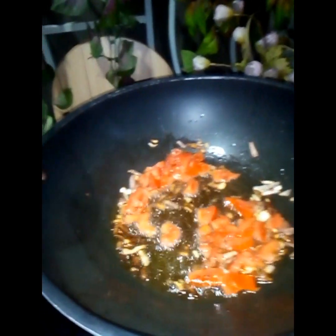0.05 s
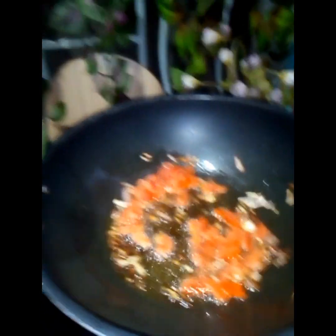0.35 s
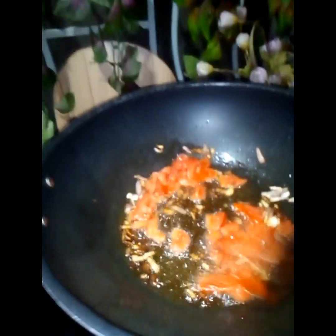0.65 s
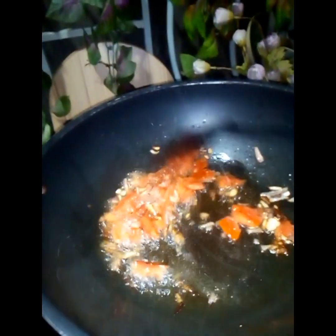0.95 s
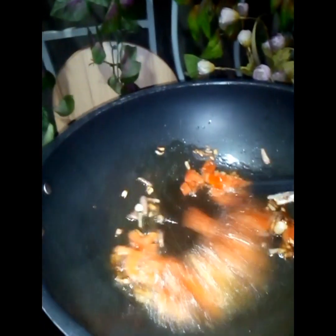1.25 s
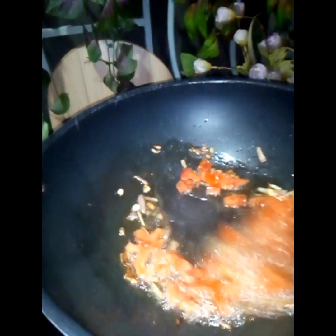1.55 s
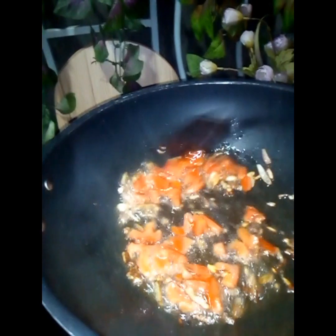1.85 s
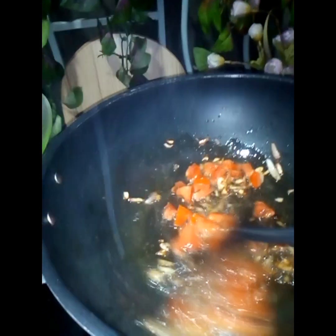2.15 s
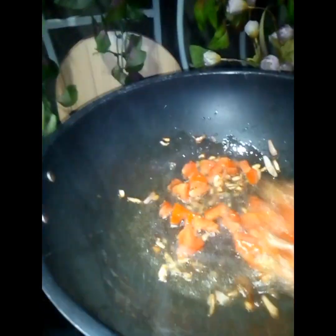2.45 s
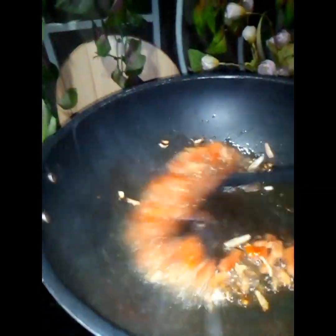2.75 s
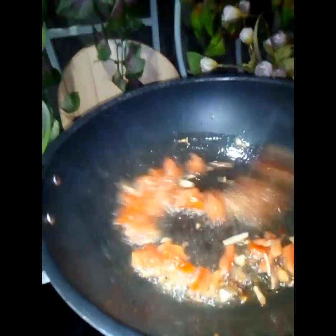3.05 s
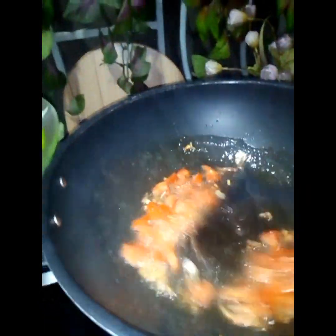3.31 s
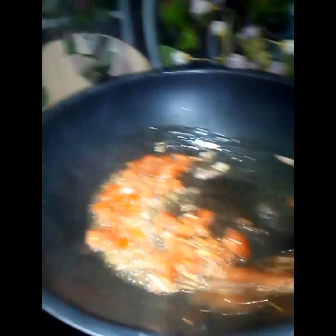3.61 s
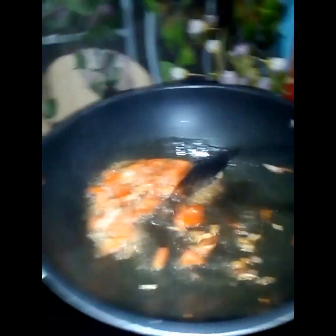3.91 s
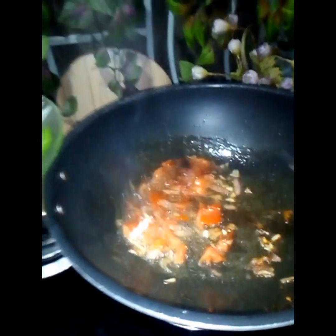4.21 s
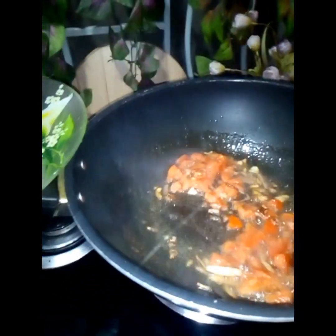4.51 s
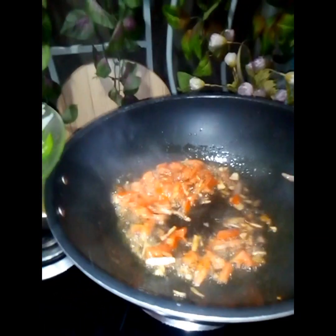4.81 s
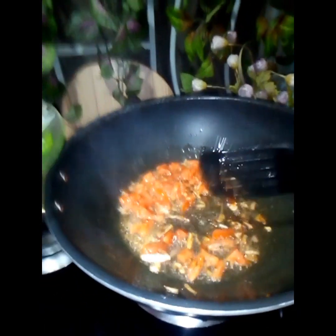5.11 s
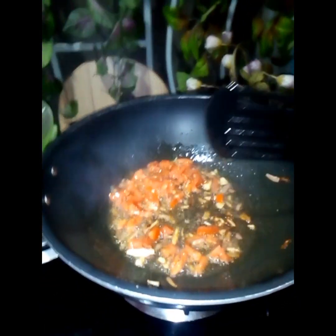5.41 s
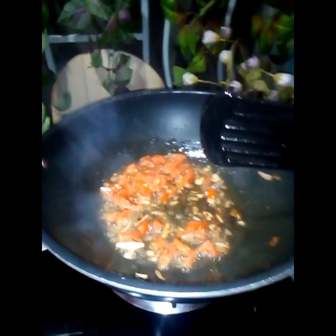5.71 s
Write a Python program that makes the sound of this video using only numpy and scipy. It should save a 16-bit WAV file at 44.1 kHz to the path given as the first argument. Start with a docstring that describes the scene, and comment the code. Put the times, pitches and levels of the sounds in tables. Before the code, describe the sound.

Close, bright sizzling and popping of vegetables frying in a wok, with faint wet stirring and two light spatula knocks.

```python
"""A small kitchen, with one microphone close to a wok of chopped onion and tomato frying in hot oil.
Countless steam bubbles burst in the oil; a few drops spit louder and the finest tick on the bare metal.
A plastic spatula rubs the pan, squeezes the wet food and knocks twice; early on it shakes the wok too.
A low throb, like a motor some way off, comes and goes underneath; the room adds a short tail."""
import sys
import numpy as np
from scipy import signal
from scipy.io import wavfile
from scipy.ndimage import uniform_filter1d

SR = 44100
rng = np.random.default_rng(int(sys.argv[2]) if len(sys.argv) > 2 else 0)


def persist_wave(psi):
    """Save psi, clipped to +-1, as 16-bit WAV."""
    counts = np.round(np.clip(psi, -1, 1) * 32767).astype(np.int16)
    wavfile.write(sys.argv[1], SR, np.atleast_2d(counts).T)


N = 262826
TIME = np.arange(N) / SR


def gain_of(db):
    """Decibels to amplitude."""
    return 10 ** (np.asarray(db) / 20)


def evened(x):
    """Scales to an rms of 1."""
    return x / np.sqrt(np.mean(x ** 2) + 1e-20)


def steadied(x, window_s=0.25):
    """Takes the slow swells out of a texture and leaves its fast grain."""
    return x / np.sqrt(abs(uniform_filter1d(x ** 2, max(int(window_s * SR), 2))) + 1e-12)


def levels(table):
    """The dB columns of a curve table as gains, sample by sample."""
    times, *columns = np.transpose(table)
    return [gain_of(np.interp(TIME, times, db)) for db in columns]


def arch(start, length):
    """Half a sine that swells from 0 to 1 and settles again."""
    return np.sin(np.pi * np.clip((TIME - start) / length, 0, 1))


def wander(window_s):
    """A smooth random drift of rms 1."""
    window = signal.windows.hann(max(int(window_s * SR), 3))
    return evened(signal.oaconvolve(rng.standard_normal(N), window, "same"))


def add(mix, start, sound, peak_db):
    """Mixes a sound in at a start time in seconds, scaled to the given peak."""
    part = mix[max(round(start * SR), 0):][:len(sound)]
    part += gain_of(peak_db) * sound[:len(part)] / abs(sound).max()


def bandpassed(x, low_hz, high_hz, order):
    """Keeps the band between two frequencies."""
    return signal.sosfilt(signal.butter(order, [low_hz, high_hz], "band", fs=SR, output="sos"), x)


def coloured(x, spectrum, size=8192):
    """Causal filter with the given spectrum, so clicks keep their attack; rms 1."""
    hz, db = np.transpose(spectrum)
    grid = np.maximum(abs(np.fft.fftfreq(size, 1 / SR)), 1)
    octaves_outside = np.maximum(np.log2(hz[0] / grid), 0) + np.maximum(np.log2(grid / hz[-1]), 0)
    grid_db = np.interp(np.log(grid), np.log(hz), db) - 60 * octaves_outside
    log_gain = np.log(gain_of(np.maximum(grid_db, -100)))
    taps = np.fft.ifft(np.exp(np.conj(signal.hilbert(log_gain)))).real[:size // 2]  # minimum phase
    return evened(signal.oaconvolve(x, taps)[:N])


def clicks(per_s, spread_db):
    """Random clicks, most small and a few large when the spread is positive."""
    strength = gain_of(spread_db * np.minimum(rng.exponential(1, N), 4.5))
    return strength * rng.choice([-1., 1.], N) * (rng.random(N) < per_s / SR)


def grains(train, shapes):
    """Each click sets off one of the shapes, picked at random."""
    pick = rng.integers(0, len(shapes), N)
    onsets = np.flatnonzero(train)
    places = onsets[:, None] + np.arange(shapes.shape[1])
    sounds = train[onsets, None] * shapes[pick[onsets]]
    return np.bincount(places.ravel(), sounds.ravel(), N)[:N]


def kitchen(x, wet_db, t60, size=12000):
    """Direct sound at the microphone, plus dense reflections off the wok wall and the room."""
    t = np.arange(size) / SR
    reflections = rng.standard_normal(size) * (rng.random(size) < .1) * (t > .001)
    tail = reflections * gain_of(-60 * t / t60)
    return x + gain_of(wet_db) * signal.oaconvolve(x, tail / np.linalg.norm(tail))[:N]


def diffuse(x, wet_db, t60, size=8000):
    """Reflections of scattered bursts, each on its own path, blur into a hiss that follows them."""
    fade = gain_of(-120 * np.arange(size) / SR / t60)  # power falls 60 dB in t60
    power = abs(signal.oaconvolve(x ** 2, fade / fade.sum())[:N])
    return x + gain_of(wet_db) * np.sqrt(power) * rng.standard_normal(N)


def bursts(per_s, spread_db, decay_s, count=200, size=256):
    """Oil films tear: tiny puffs of noise in many colours."""
    shapes = rng.standard_normal((count, size)) * np.exp(-np.arange(size) / SR / decay_s)
    return evened(grains(clicks(per_s, spread_db), shapes))


def bubbles(per_s, spread_db, centre_hz, octaves, decay_s, count=200, size=400):
    """Small steam bubbles ring briefly, at pitches scattered round a centre."""
    t = np.arange(size) / SR
    hz = centre_hz * 2 ** (octaves * rng.uniform(-1.002, 1, (count, 1)))
    rings = np.sin(2 * np.pi * hz * t) * np.exp(-t / decay_s)
    return evened(grains(clicks(per_s, spread_db), rings))


def spurting(per_s, decay_s, limit=0.8):
    """Pockets of water meet the oil: each flares at once, up to a limit, and dies away; rms 1."""
    kicks = abs(clicks(per_s, spread_db=5.5))
    flare = signal.lfilter([1], [1, -np.exp(-1 / (SR * decay_s))], kicks - kicks.mean())
    return evened(np.tanh(evened(flare) / limit))


# Bubble size, as the weight of low bubbles over high ones: (time [s], tilt [dB])
BUBBLE_SIZE = [(0, 3), (0.4, -1), (0.8, 0.5), (2.15, 0.5), (2.6, 1.5), (2.83, 2), (3.1, 1.7), (3.45, 0),
               (3.9, -1), (4.4, -0.5), (4.8, -0.3), (4.98, 2), (5.14, 0.5), (5.24, -2.5), (5.45, -1.5),
               (5.6, 3.5), (5.75, -1), (5.96, 0.5)]
def sized(x, split_hz=4080):
    """Larger bubbles ring lower: tips the sizzle to below or above its middle pitch."""
    lower = signal.sosfiltfilt(signal.butter(8, split_hz, fs=SR, output="sos"), x)
    weight = np.sqrt(levels(BUBBLE_SIZE)[0])
    return lower * weight + (x - lower) / weight


# Modes of the loaded wok: (frequency [Hz], level [dB], t60 [s])
WOK_MODES = [(272, 7, 0.12), (335, 3, 0.08), (433, 8, 0.07), (535, 8, 0.06), (614, 4, 0.09), (665, 4, 0.14),
             (845, 3, 0.06), (958, -8, 0.14), (1112, -7, 0.09), (1289, -3, 0.076), (1439, -7, 0.046),
             (1935, -5, 0.08), (2190, -5, 0.064)]
# Colour of the bursts under the food: (frequency [Hz], level [dB])
CRACKLE_COLOUR = [(500, -45), (780, -33.5), (950, -1.5), (1150, -3.5), (1400, -4.5), (1620, 1.5),
                  (1950, -2.5), (2300, -1), (2800, 1.5), (3500, -17.5)]
def crackle(fizz, ring_db=3.0):
    """Bursts under the food sound duller and ring the modes of the wok."""
    snaps = 0.82 * fizz + bursts(per_s=900, spread_db=1.5, decay_s=0.0013)
    dull = coloured(snaps, CRACKLE_COLOUR)
    rings = sum(gain_of(db) * signal.lfilter(*signal.iirpeak(hz, hz * t60 / 2.2, SR), dull)
                for hz, db, t60 in WOK_MODES)
    return steadied(dull + gain_of(ring_db) * rings)


# Colour of the fine spray over the pan: (frequency [Hz], level [dB])
SPRAY_COLOUR = [(6500, -24.5), (8300, 1.5), (10000, -12), (12000, -22), (15500, -35)]
def spray(fizz):
    """The top of the fizz, joined by fine droplets that burst on their own."""
    droplets = 0.91 * fizz + bursts(per_s=1200, spread_db=-3.0, decay_s=.001)
    return steadied(coloured(droplets, SPRAY_COLOUR))


# How hard the food fries, close to the microphone: (time [s], sizzle [dB], crackle [dB], spray [dB])
FRYING = [(0, -34.5, -51, -75), (0.25, -35.5, -59, -76), (0.44, -33.5, -48.5, -74.5),
          (0.56, -29, -48.5, -63), (1.05, -28.5, -44.5, -63.5), (1.75, -27.5, -44, -64.5),
          (2.0, -28.5, -45, -63.0), (2.18, -26.2, -42.5, -62), (2.38, -27, -44, -64),
          (2.55, -28.5, -44, -63.5), (2.8, -27, -44.5, -63), (3.05, -28.5, -44, -64.0),
          (3.28, -30.5, -45.5, -67.5), (3.55, -31.5, -46.5, -64.5), (4.3, -31, -46.5, -65.5),
          (5.05, -32, -47.5, -68.5), (5.3, -33, -48.5, -70.5), (5.96, -32.5, -48.5, -70.5)]
# Wet food lands on bare hot metal and the sizzle flares: (start [s], length [s], lift [dB])
FLARES = [(0.928, 0.082, 2.5), (1.075, 0.077, 2.5), (2.128, .13, 1.7), (2.252, .1, 1.7), (2.96, 0.086, 1.5),
          (3.132, 0.1, 1.5), (3.31, 0.039, 2.5), (3.396, 0.059, 2), (3.576, 0.13, 2), (3.788, 0.18, 2.5),
          (4.72, 0.11, 2.2), (4.865, 0.065, 1.5), (4.942, 0.13, 3), (5.065, 0.13, 2.5), (5.2, 0.058, 1.5),
          (5.345, 0.07, 2.5), (5.456, 0.075, 1.5), (5.566, 0.09, 2.5), (5.78, 0.066, 1.5)]
# From separate spurts to an even wash and back: (time [s], unevenness [dB], large bubbles [dB])
SPUTTER = [(0, 4, -14), (0.42, 2.2, -8), (0.65, 1.3, -17), (2.2, 0.16, -24.5), (5.2, 0.6, -17.5),
           (5.45, 0.8, -13.5), (5.96, -2, -14)]
# Colour of the bubbles bursting in the open oil: (frequency [Hz], level [dB])
SIZZLE_COLOUR = [(1500, -62), (2000, -43), (2400, -18.5), (2850, -6), (3400, -3), (3800, -3), (4220, 0.5),
                 (4900, -4.5), (5350, -6.5), (5900, -9.5), (6600, -11), (7100, -19), (7900, -27.5),
                 (9500, -60.5)]
def sizzle(spray_flare_share=0.46, splatter_db=0.5):
    """Bursts and ringing bubbles spurt over a hiss of steam, with crackle below and spray above."""
    heat, crackle_level, spray_level = levels(FRYING)
    flare_db = sum(db * arch(start, length) for start, length, db in FLARES)
    heat *= gain_of(flare_db)
    spray_level *= gain_of(spray_flare_share * flare_db + splatter_db * spurting(per_s=37, decay_s=.025))

    times, uneven_db, large_db = np.transpose(SPUTTER)
    tearing = bursts(per_s=2000, spread_db=1.1, decay_s=0.00058)
    ringing = bubbles(per_s=650, spread_db=2.5, centre_hz=4149, octaves=0.279, decay_s=0.0043, size=500)
    spurts = gain_of(np.interp(TIME, times, uneven_db) * spurting(per_s=280, decay_s=0.012))
    steam = gain_of(0.5) * (heat / heat.max()) ** 0.063 * rng.standard_normal(N)
    fizz = diffuse(spurts * (tearing + gain_of(-7.5) * ringing + steam), wet_db=-3.5, t60=0.1)

    large = bubbles(per_s=500, spread_db=0.5, centre_hz=2775, octaves=0.27, decay_s=0.00075)
    large = gain_of(np.interp(TIME, times, large_db)) * spurts * bandpassed(large, 1900, 3600, order=2)
    bright = steadied(sized(coloured(fizz, SIZZLE_COLOUR)) + large, window_s=0.12)
    return (gain_of(-0.28) * heat * bright
            + gain_of(1.5) * crackle_level * crackle(fizz)
            + gain_of(3.5) * spray_level * spray(fizz))


# Puffs of mist as wet food is swept onto bare metal: (start [s], length [s], level [dB])
MIST_PUFFS = [(0.5, 0.24, -76.5), (1.05, 0.14, -74), (1.44, 0.08, -75), (2.08, 0.32, -75),
              (2.52, 0.51, -74), (2.97, 0.25, -76), (4.66, 0.19, -79)]
def mist(under_spray_db=-20.0, spatter_db=2.0):
    """Very high, thin fizz that spatters along with the spray and thickens in each puff."""
    _, _, spray_level = levels(FRYING)
    puffs = sum(gain_of(db) * arch(start, length) for start, length, db in MIST_PUFFS)
    level = np.hypot(gain_of(under_spray_db) * spray_level, puffs)
    spatter = gain_of(spatter_db * spurting(per_s=70, decay_s=.014))
    fizz = bandpassed(bursts(per_s=1200, spread_db=2.0, decay_s=.0015), 10000, 15500, order=3)
    return level * evened(spatter * fizz)


# The loudest spits of oil, close by: (time [s], level [dB], pitch [Hz], decay [s])
LOUD_SPITS = [(0.061, -22, 4340, .004), (0.0946, -22, 4370, .002), (0.1272, -18, 3800, 0.0065),
              (0.133, -17, 5040, .005), (0.143, -15, 4900, .002), (0.169, -21, 3900, 0.007),
              (0.2286, -20.5, 3580, 0.011), (0.3012, -18, 3500, 0.0094), (0.3306, -20, 3610, 0.0067),
              (0.38, -20, 3460, .003), (0.4128, -13, 3630, 0.002), (0.578, -11, 3800, 0.0037),
              (0.719, -11, 4000, 0.0022), (0.802, -14.5, 3370, 0.0064), (0.8916, -12.5, 4230, .002),
              (1.153, -10, 4380, 0.0027), (1.4704, -10.5, 4240, 0.0028), (2.0836, -13, 3730, 0.0027),
              (2.221, -11, 4740, 0.0046), (2.347, -9, 4180, 0.0058), (2.435, -10, 4010, 0.0076),
              (2.765, -9, 4300, 0.00063), (2.899, -13, 4370, 0.0026), (3.1434, -13, 4400, 0.0043),
              (3.3154, -20, 4060, .002), (4.021, -13, 3670, 0.0054), (5.144, -16.5, 3860, .006),
              (5.235, -20.5, 4130, .005), (5.6084, -15, 3740, 0.0057), (5.6781, -18, 3480, 0.0054)]
def spits(crack=0.52, small_db=7, small_hz=4300, small_decay_s=0.001, small_count=28, size=1600):
    """A water drop flashes to steam: a crack and a short ring. Small ones follow the frying's level."""
    out, t = np.zeros(N), np.arange(size) / SR
    band_hz = (2400, 5600)
    times, heat_db = np.transpose(FRYING)[:2]
    small_spits = []
    for start, loud, high in rng.uniform([0, -1, -1], [N / SR, 1, 1], (small_count, 3)):
        db = np.interp(start, times, heat_db) + small_db + 2 * loud
        small_spits.append((start, db, small_hz * 2 ** (0.53 * high), small_decay_s))
    for start, db, hz, decay_s in LOUD_SPITS + small_spits:
        tear = evened(bandpassed(rng.standard_normal(size), *band_hz, order=3))
        pop = (np.sin(2 * np.pi * hz * t) + crack * tear) * np.exp(-t / decay_s)
        add(out, start, pop, db)
    return gain_of(-4.0) * bandpassed(diffuse(out, wet_db=-15.0, t60=0.24), *band_hz, order=3)


# The finest droplets on bare hot metal: (time [s], level [dB], pitch [Hz])
DROPLET_TICKS = [(0.1225, -49, 10100), (0.31, -61, 10800), (2.903, -57, 12500)]
def ticks(decay_s=0.0022, width_hz=1700, size=1000):
    """A pinhead of water skips on the pan: a thin, very high tick."""
    out, t = np.zeros(N), np.arange(size) / SR
    for start, db, hz in DROPLET_TICKS:
        snap = rng.standard_normal(size) * np.exp(-t / decay_s)
        add(out, start, bandpassed(snap, hz - width_hz / 2, hz + width_hz / 2, order=6), db)
    return kitchen(out, wet_db=-8, t60=0.091)


# The spatula pushes the food round, close by: (time [s], rub [dB], squelch [dB])
STIRRING = [(0.0, -83, -102), (0.38, -90, -77), (0.52, -60, -53), (0.7, -65, -59), (0.88, -56.5, -61),
            (1.01, -54.5, -53), (1.9, -54, -55.5), (2.3, -55, -54), (3.15, -58, -53.5), (3.33, -57, -54.5),
            (3.92, -66, -59.5), (4.1, -61.5, -55.5), (4.38, -57, -54.5), (4.52, -70, -62.5),
            (4.62, -72.5, -60), (4.88, -74.5, -60), (4.96, -80.5, -64.5), (5.7, -84, -65), (5.96, -65, -58)]
# Colours of plastic on the pan and of squeezed wet food: (frequency [Hz], level [dB])
RUB_COLOUR = [(150, -16), (230, -14.5), (290, -5), (340, 6), (385, 0.5), (430, 6.5), (490, -10.5),
              (600, -23)]
SQUELCH_COLOUR = [(400, -28.5), (490, 5.5), (550, 13), (650, 10), (760, 13), (900, 10.5), (1100, -7)]
def stirring(rub_uneven_db=1.5, squelch_uneven_db=3.0):
    """The spatula sticks and slips on the pan and squeezes wet food; the hand presses unevenly."""
    rub_level, squelch_level = levels(STIRRING)
    rub_level *= gain_of(0.5 + rub_uneven_db * wander(window_s=0.067))
    rub = steadied(coloured(clicks(per_s=570, spread_db=2.0), RUB_COLOUR))
    squelch_level *= gain_of(1.5 + squelch_uneven_db * wander(window_s=0.077))
    squelch = steadied(coloured(clicks(per_s=660, spread_db=0.0), SQUELCH_COLOUR))
    return rub_level * rub + squelch_level * squelch


# The throb, some way off: (start [s], length [s], level [dB], pitch [Hz], noise over tone [dB])
THROB_SPELLS = [(0.41, 0.35, -61, 142.3, 1), (1.16, 0.85, -57.5, 133.4, -4.5), (2.151, 0.96, -55.5, 118, 1),
                (3.308, 0.73, -54.5, 131.3, -4), (4.4, 0.57, -59.5, 132.2, -3), (5.32, 0.4, -60, 127, -6)]
# Colour of the noise around the throb: (frequency [Hz], level [dB])
THROB_COLOUR = [(40, -44), (70, -49), (90, -38), (110, 0), (128, 3), (148, -1), (170, -5), (220, -20.5),
                (320, -83)]
def throb(beats_per_s=22.5, waver=0.0179, depth=0.63, rise_share=0.39, release_s=0.073, rest_db=-90):
    """A wavering, beating low tone blurred by noise; each spell rises, holds and dies away."""
    level = np.full(N, gain_of(rest_db))
    for start, length, db, _, _ in THROB_SPELLS:
        rise = np.clip((TIME - start) / (rise_share * length), 0, 1)
        release = np.exp(-np.maximum(TIME - start - length, 0) / release_s)
        level += gain_of(db) * rise * release
    starts, _, _, pitch_hz, blur_db = np.transpose(THROB_SPELLS)
    spell = np.maximum(np.searchsorted(starts, TIME) - 1, 0)
    speed = 1 + waver * wander(window_s=0.293)
    cycles = np.cumsum(speed * pitch_hz[spell]) / SR
    beating = 1 + depth * np.cos(2 * np.pi * beats_per_s * np.cumsum(speed) / SR)
    tone = evened(np.sin(2 * np.pi * cycles) * beating)
    blur = gain_of(blur_db[spell])
    noise = coloured(rng.standard_normal(N), THROB_COLOUR)
    return level * (tone + blur * noise) / np.sqrt(1 + blur ** 2)


# Trapped steam escapes from under the food: (start [s], length [s], level [dB])
STEAM_ESCAPES = [(0.467, 0.03, -37), (5.432, 0.026, -36), (5.885, 0.037, -32)]
def gurgles():
    """Large, quickly damped bubbles of many pitches burst in a crowd."""
    level = sum(gain_of(db) * arch(start, length) for start, length, db in STEAM_ESCAPES)
    crowd = bubbles(per_s=880, spread_db=3.0, centre_hz=3100, octaves=0.26, decay_s=0.0009)
    return level * evened(bandpassed(crowd, 2000, 4200, order=2))


# Low rumble, first close by, then faint and far off: (time [s], level [dB])
RUMBLE_LEVEL = [(0, -91), (0.65, -75), (0.77, -64), (0.92, -63), (1.01, -76), (1.1, -60), (1.33, -56.5),
                (1.45, -58.5), (1.9, -58), (2.08, -70.5), (2.25, -56.5), (2.68, -73), (2.95, -58.5),
                (3.19, -67), (3.33, -79), (3.55, -71), (3.9, -71), (4.1, -73), (4.38, -86), (4.7, -72),
                (4.9, -75), (5.15, -86), (5.96, -78)]
# Colour of the rumble: (frequency [Hz], level [dB])
RUMBLE_COLOUR = [(22, -24), (38, -17), (62, -13.5), (85, -1), (110, -7), (150, -15), (220, -25),
                 (320, -31.5)]
def low_rumble(uneven_db=1.0):
    """The wok shaking under stirring until about 3.3 s, then the deep underside of the distant throb."""
    rumble = steadied(coloured(clicks(per_s=440, spread_db=0.0), RUMBLE_COLOUR), window_s=0.14)
    swell = gain_of(3.5 + uneven_db * wander(window_s=0.092))
    return levels(RUMBLE_LEVEL)[0] * swell * rumble


# Spatula against the wok, close by: (time [s], thud [dB], clack [dB], top of the clack [Hz],
# thud low-pass [Hz], thud high-pass [Hz], ring length [factor], rebound delay [s], rebound [dB])
SPATULA_KNOCKS = [(1.529, -22.5, -24.5, 3000, 1100, 294, 0.71, 0.0061, -21),
                  (5.7673, -28.5, -21.5, 3580, 630, 225, 0.64, 0.00736, -2)]
def knocks(clack_decay_s=0.004, clack_low_hz=1000, size=12000):
    """The spatula strikes and rebounds: the blade snaps and the wok thuds, duller for a soft contact."""
    thuds, clacks, t = np.zeros(N), np.zeros(N), np.arange(size) / SR
    for start, thud_db, clack_db, top_hz, soft_hz, low_hz, ring, rebound_s, rebound_db in SPATULA_KNOCKS:
        thud = sum(gain_of(db - 60 * t / (t60 * ring)) * np.sin(2 * np.pi * hz * t)
                   for hz, db, t60 in WOK_MODES)
        thud = signal.lfilter(*signal.butter(2, soft_hz, fs=SR), thud)
        thud = signal.lfilter(*signal.butter(4, low_hz, "high", fs=SR), thud)
        for delay, strike_db in ((0, 0), (rebound_s, rebound_db)):
            snap = rng.standard_normal(size) * np.exp(-t / clack_decay_s)
            clack = bandpassed(snap, clack_low_hz, top_hz, order=4)
            add(thuds, start + delay, thud, strike_db + thud_db)
            add(clacks, start + delay, clack, strike_db + clack_db)
    return kitchen(thuds, wet_db=0.5, t60=0.25) + kitchen(clacks, wet_db=-4, t60=0.1)


def scene():
    """Everything reaches one microphone close to the wok, alike in both channels."""
    mono = (sizzle() + mist() + spits() + ticks() + stirring()
            + throb() + gurgles() + low_rumble() + knocks())
    return np.array([mono, mono])


def record(dry, edge_hz=15500):
    """The recorder's band limit cuts the highest treble."""
    lowpass = signal.firwin(511, edge_hz, window=("kaiser", 9), fs=SR)
    return signal.oaconvolve(dry, lowpass[None], "same")


dry = scene()
out = record(dry)
persist_wave(out)
```